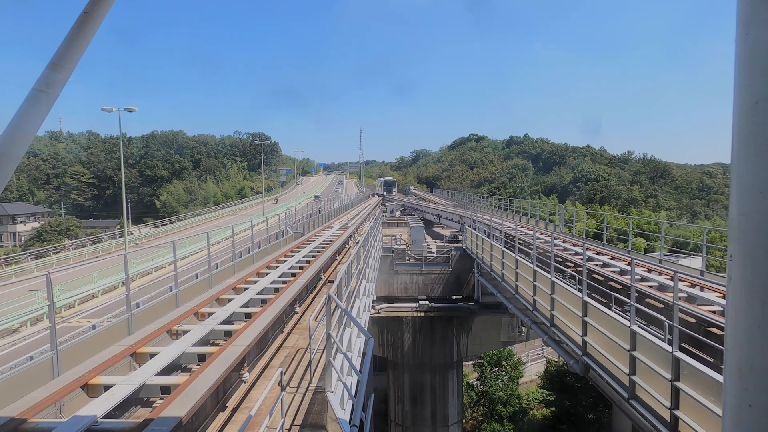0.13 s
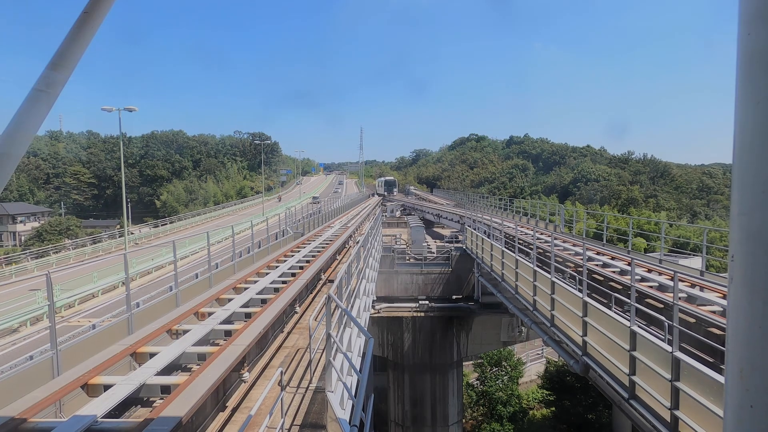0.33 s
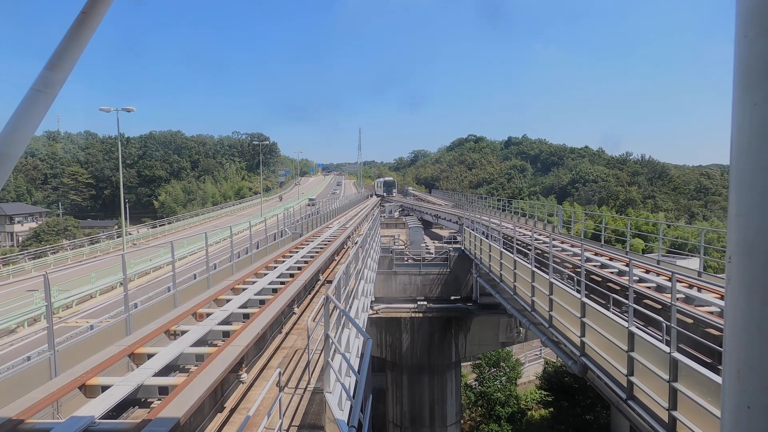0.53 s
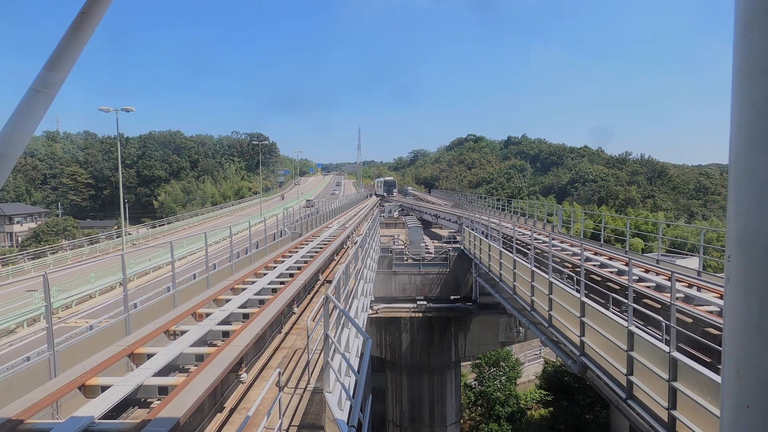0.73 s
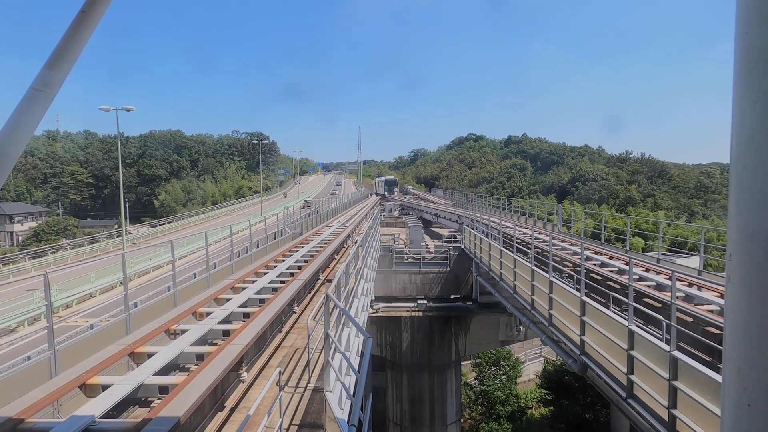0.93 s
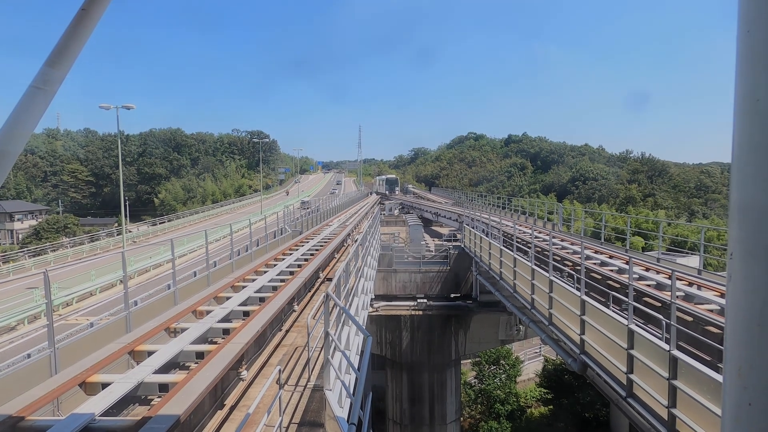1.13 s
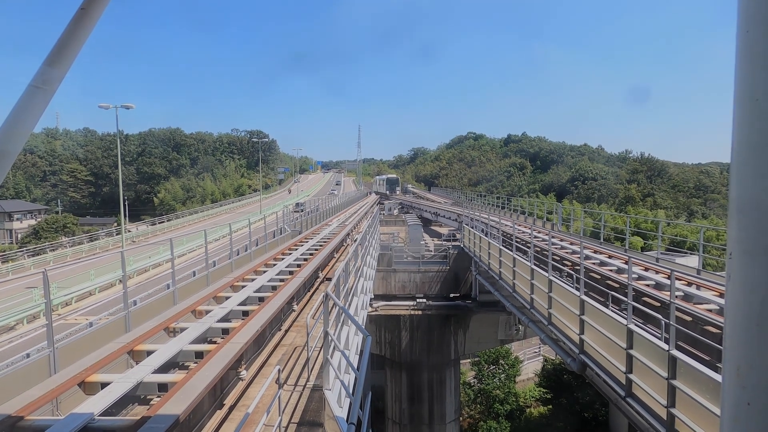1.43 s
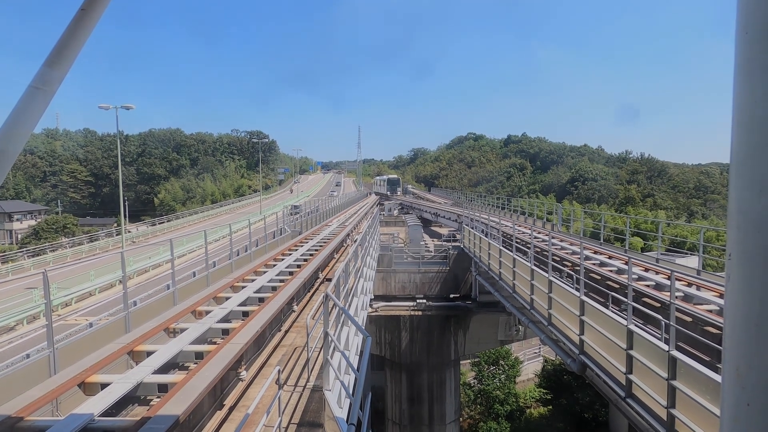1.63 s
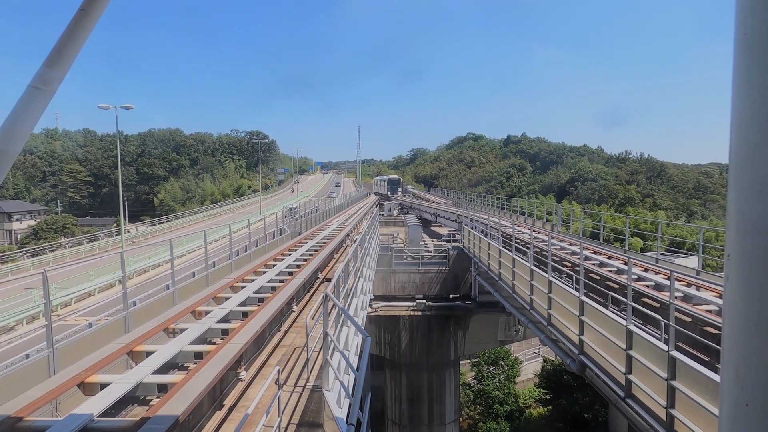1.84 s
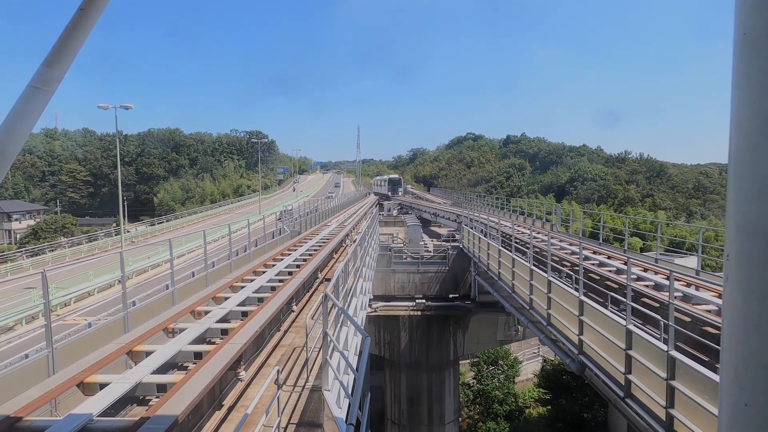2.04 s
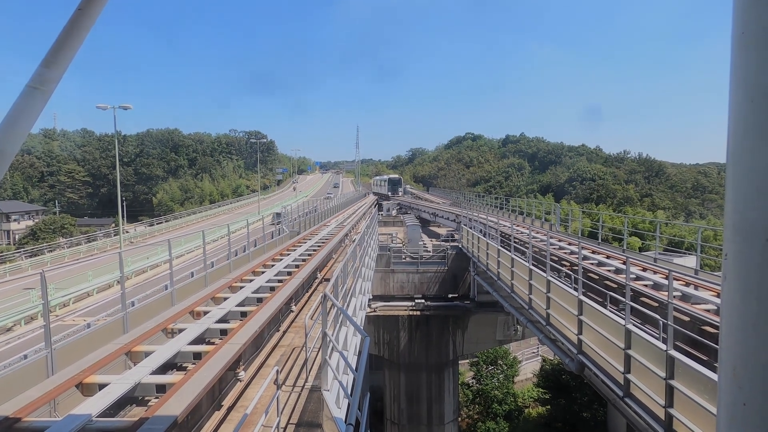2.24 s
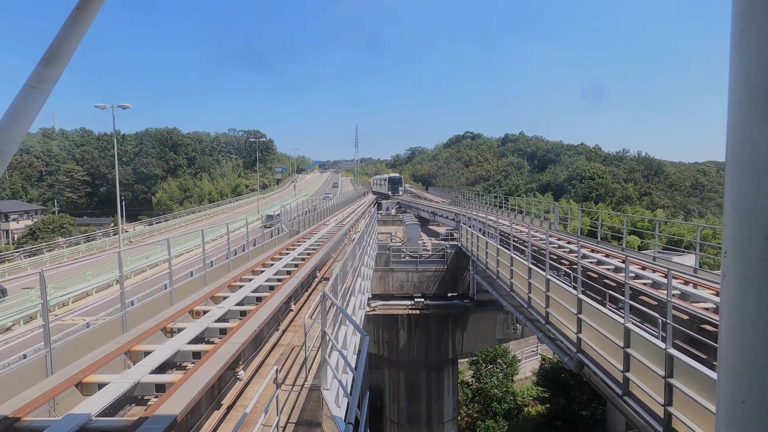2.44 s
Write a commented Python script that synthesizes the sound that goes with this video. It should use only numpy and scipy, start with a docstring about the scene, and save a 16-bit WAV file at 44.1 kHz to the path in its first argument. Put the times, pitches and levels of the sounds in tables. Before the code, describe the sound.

After a moment of silence, dull wide tyre roar opens at once; two distant engines drone in the bass, one rising and falling, one climbing, while a distant train whines thinly; open air, small stereo pair.

```python
"""Tyre roar of a road, heard outdoors beside an elevated track: noise shaped by band, swelling with traffic.
Two far engines sound in the bass as sums of firing orders: one revs up and eases off, one climbs steadily.
A distant train's drive adds a thin rising whine of fluttering partials, with faint tones and a hissy band.
A small stereo microphone pair opens after a short silence."""
import sys
import numpy as np
from scipy import signal
from scipy.io import wavfile
from scipy.ndimage import uniform_filter1d

SR = 44100
rng = np.random.default_rng(int(sys.argv[2]) if len(sys.argv) > 2 else 0)


def convert_level_to_amplitude(level_db):
    """Map a level in decibels to its linear amplitude factor."""
    exponent = np.asarray(level_db, float) / 20
    return 10 ** exponent


def wav_out(sig):
    """Save sig, one row per channel (or a flat mono array), as 16-bit PCM at SR to the path in sys.argv[1]."""
    wavfile.write(sys.argv[1], SR, np.round(np.clip(np.atleast_2d(sig).T, -1, 1) * 32767).astype(np.int16))


N = 114660
t = np.arange(N) / SR

# swell of the nearest traffic: (time [s], level [dB])
TRAFFIC_SWELL = [(.14, -1), (.6, -0.5), (.96, 1), (1.24, 1.5), (1.54, 0), (1.79, -2.5), (2.0, -4),
                 (2.3, -3), (2.59, -5)]
# share of that swell reaching each band: (frequency [Hz], share [1])
SWELL_SHARE = [(100, 0.13), (300, 0.51), (650, 1.11), (1100, 1.02), (2800, 0.2), (6000, 0.65)]
# relative spectral density of the road noise: (frequency [Hz], level [dB per Hz])
ROAR_SPECTRUM = [(15, -27), (22, -11), (43, -5), (64, -7.5), (115, -11.5), (170, -10.5), (300, -15),
                 (540, -17.5), (733, -16.5), (966, -9), (1140, -10.5), (1510, -20), (2040, -23.5),
                 (4200, -39.5), (8600, -58.5), (12600, -75.5), (14000, -87)]
# likeness of the road noise in the two ports: (frequency [Hz], correlation [1])
PORT_LIKENESS = [(150, .9965), (400, .98), (560, .89), (1000, .87), (1700, .78), (3200, .49), (4400, .22),
                 (7500, .06)]
# phase by which the left port leads: (frequency [Hz], lead [rad])
PORT_LEAD = [(900, 0), (2800, -.5), (4200, -1.1), (5700, -3.3)]
# balance, left minus right: (frequency [Hz], level [dB])
PORT_LEAN = [(200, -.1), (400, .8), (1000, 2.4), (2000, 1.7), (4800, -1), (6500, .8)]
ROAR_DB = -24  # rms of the whole road noise

# firing rate of the engine that revs up and eases off: (time [s], frequency [Hz])
REVVING_HZ = [(.14, 59.71), (.63, 70.67), (1.2, 80.46), (1.7, 87.64), (2.0, 82.8), (2.3, 71.27),
              (2.59, 67.6)]
# its orders, swelling with the air path: (time [s], order 1 [dB], order 2 [dB])
REVVING_ORDERS = [(.15, -18, -50), (.25, -24, -47), (.33, -29, -54), (.47, -25.5, -40.5), (.59, -34, -36.5),
                  (.75, -33, -40.5), (.95, -24, -37.5), (1.13, -39.5, -35), (1.27, -28, -38),
                  (1.4, -35, -31), (1.63, -26, -35), (1.8, -38, -34.5), (2.03, -22, -45.5),
                  (2.11, -30.5, -36.5), (2.29, -20.5, -40), (2.39, -46, -36), (2.45, -29, -52),
                  (2.57, -51, -40.5)]
# its third order: (time [s], level [dB])
REVVING_ORDER_3 = [(.3, -48), (.51, -37.5), (1.2, -42.5), (1.4, -48.5), (1.63, -36.5), (1.8, -44)]
# firing rate of the heavy engine pulling steadily: (time [s], frequency [Hz])
PULLING_HZ = [(.14, 32.73), (1.1, 43), (1.7, 50.61), (2.59, 59.44)]
# its first order: (time [s], level [dB])
PULLING_ORDERS = [(.15, -55), (.23, -27.5), (.45, -44), (.57, -28), (.75, -33.5), (1.17, -29.5),
                  (1.33, -36), (1.41, -28), (1.53, -26), (1.89, -22), (2.009, -28), (2.45, -25.5),
                  (2.57, -36)]
# its third order: (time [s], level [dB])
PULLING_ORDER_3 = [(1.299, -48.5), (1.529, -31.5), (1.75, -33.5), (1.95, -50)]
ENGINE_WOBBLE = 0.011  # relative rms unsteadiness of the firing rate

# pitch of the train's drive: (time [s], frequency [Hz])
DRIVE_HZ = [(.14, 2061), (.9, 2088), (1.4, 2099), (1.86, 2117)]
# lower partials of the whine: (time [s], partial 1 [dB], partial 2 [dB])
LOWER_PARTIALS = [(.15, -46.5, -59), (.25, -46, -69), (.39, -36.5, -73), (.46, -37.5, -58), (.53, -40, -52),
                  (.6, -39.5, -60), (.66, -49, -68), (.71, -34.5, -67), (.8, -40, -66), (.89, -32, -70),
                  (.99, -46, -59.5), (1.06, -37, -61), (1.18, -43.5, -58), (1.26, -36, -70),
                  (1.37, -37, -63), (1.44, -53, -71), (1.54, -40, -74), (1.66, -46, -76),
                  (1.71, -39.5, -72), (1.77, -50, -78), (1.84, -38.5, -72)]
# upper partials of the whine: (time [s], partial 3 [dB], partial 4 [dB])
UPPER_PARTIALS = [(.14, -71, -76), (.45, -71, -74.5), (.6, -75, -68), (.8, -82, -78), (.99, -74, -66.5),
                  (1.1, -76, -79), (1.6, -85, -87)]
# swing of partial 1 between the ports: (time [s], left minus right [dB], left leads [rad])
WHINE_SWING = [(.15, -2, -.2), (.44, -1, .5), (.63, 11, 1.8), (.7, 0, .7), (.93, 12, -1), (1.02, 3, -.2),
               (1.13, 13, -2.2), (1.21, -11, -1.5), (1.34, 0, -.9), (1.66, -9, 1.7), (1.84, 7, -.3)]
# fainter tones: (start [s], end [s], start frequency [Hz], end frequency [Hz], level at mid-tone [dB])
FAINT_TONES = [(.14, .8, 2028, 2036, -46), (.78, 1.05, 1983, 1978, -44), (1.2, 1.33, 1984, 1984, -44),
               (1.35, 1.8, 2038, 2052, -48), (.6, 1.3, 8500, 8545, -77)]
WHINE_STOP_S, WHINE_FADE_S = 1.87, 0.023  # the fade ends at the stop
# the other tones swing by chance about a mean lean and lead of the left port (swing as rms)
MEAN_LEAN_DB, MEAN_LEAD_RAD, SWING_DB, SWING_RAD = 1, -0.25, 6.5, 0.66
FLUTTER_HZ, FLUTTER_DB = 34.85, 3.5  # fastest rate; rms depth for the high and faint tones
WAVER = 0.00087  # relative rms waver of pitch
HISS_HZ, HISS_WIDTH_HZ, HISS_DB = 8570, 270, -69  # band near the top partial
HISS_START_S, HISS_STOP_S = 0.22, 1.67
OPEN_S, CLOSE_S = .12725, .004  # instant of opening; length of the closing fade


def evened(x):
    """Normalization of power: unit rms."""
    return x / np.sqrt(np.mean(x ** 2) + 1e-20)


def read(points, hz):
    """Interpolation of a spectrum on a logarithmic frequency axis."""
    f, value = np.transpose(points)
    return np.interp(np.log(hz + 1), np.log(f + 1), value)


def column(table, index):
    """Linear interpolation over time of one column of a table."""
    rows = np.array(table)
    return np.interp(t, rows[:, 0], rows[:, index])


def drift(rate_hz):
    """Random modulation of unit rms: superposed sines of random phase, up to rate_hz."""
    rates = np.geomspace(rate_hz / 10, rate_hz, 16)
    return evened(sum(np.sin(2 * np.pi * (f * t + rng.random())) for f in rates))


def road(patchy_db=1.08, flicker_db=-0.01):
    """Diffuse field of tyre noise: partly coherent between the ports, its swell weighted by band."""
    size, hop = 1024, 256
    frames, hz = N // hop + 5, np.fft.rfftfreq(size, 1 / SR)
    a, b, c, d, patches = rng.standard_normal((frames, len(hz), 5)).T
    patches = uniform_filter1d(patches, size=10, axis=0)
    patches = evened(uniform_filter1d(patches, size=10, axis=1))
    flicker = evened(uniform_filter1d(rng.standard_normal(frames), size=6))
    swell = np.interp(np.arange(frames) * hop / SR, *np.transpose(TRAFFIC_SWELL))

    # the right port mixes the left port's noise with noise of its own
    likeness = read(PORT_LIKENESS, hz)[:, None]
    left = a + 1j * b
    right = likeness * left + np.sqrt(1 - likeness ** 2) * (c + 1j * d)
    right = right * np.exp(-1j * read(PORT_LEAD, hz))[:, None]
    half_lean = read(PORT_LEAN, hz)[:, None] / 2
    ports = np.array([left * convert_level_to_amplitude(half_lean), right * convert_level_to_amplitude(-half_lean)])

    level = read(ROAR_SPECTRUM, hz)[:, None] + read(SWELL_SHARE, hz)[:, None] * swell
    ports *= convert_level_to_amplitude(level + patchy_db * patches + flicker_db * flicker)
    noise = signal.istft(ports, nperseg=size, noverlap=size - hop)[1][:, :N]
    return convert_level_to_amplitude(ROAR_DB) * evened(noise)


def engine(pitch, levels, third):
    """Harmonic series of firing: slightly unsteady orders locked to one phase, alike in both ports."""
    rate = column(pitch, index=1) * (1 + ENGINE_WOBBLE * drift(12))
    phase = 2 * np.pi * np.cumsum(rate) / SR
    orders = [(m, column(levels, index=m)) for m in range(1, len(levels[0]))]
    orders.append((3, column(third, index=1)))
    return sum(np.sqrt(2) * convert_level_to_amplitude(db) * np.sin(m * phase + 2 * np.pi * rng.random()) for m, db in orders)


def train():
    """Tonal radiation of the drive: harmonic partials until it cuts out, faint tones and band noise."""
    swing = column(WHINE_SWING, index=1), column(WHINE_SWING, index=2)
    whine = partial(LOWER_PARTIALS, order=1, index=1, flutter_db=1.8, swing=swing)
    whine = whine + partial(LOWER_PARTIALS, order=2, index=2, flutter_db=1.0)
    whine = whine + partial(UPPER_PARTIALS, order=3, index=1, flutter_db=FLUTTER_DB)
    whine = whine + partial(UPPER_PARTIALS, order=4, index=2, flutter_db=FLUTTER_DB)
    whine = whine * np.clip((WHINE_STOP_S - t) / WHINE_FADE_S, 0, 1)
    return whine + faint_tones() + hiss()


def partial(levels, order, index, flutter_db, swing=None):
    """Harmonicity: a tone at a whole multiple of the drive's pitch."""
    return far_tone(order * column(DRIVE_HZ, index=1), column(levels, index), flutter_db, swing)


def faint_tones():
    """Gliding sinusoids beside the partials, each rising and dying within its span."""
    out = np.zeros((2, N))
    for start, end, from_hz, to_hz, db in FAINT_TONES:
        u = np.clip((t - start) / (end - start), 0, 1)
        envelope = np.sqrt(abs(np.sin(np.pi * u)))
        out += envelope * far_tone(from_hz + (to_hz - from_hz) * u, db, FLUTTER_DB)
    return out


def hiss():
    """Band-limited noise, independent in the two ports, rising slowly and stopping quickly."""
    edges = [HISS_HZ - HISS_WIDTH_HZ / 2, HISS_HZ + HISS_WIDTH_HZ / 2]
    band = signal.butter(2, edges, "band", fs=SR, output="sos")
    noise = evened(signal.sosfilt(band, rng.standard_normal((2, N))))
    rise = np.clip((t - HISS_START_S) / .5, 0, 1)
    fall = np.clip((HISS_STOP_S - t) / WHINE_FADE_S, 0, 1)
    return convert_level_to_amplitude(HISS_DB) * rise * fall * noise


def far_tone(hz, db, flutter_db, swing=None):
    """Multipath arrival imitated: a tone flutters, and its balance and phase swing between the ports."""
    phase = 2 * np.pi * (np.cumsum(hz * (1 + WAVER * drift(15))) / SR + rng.random())
    if swing is None:
        swing = MEAN_LEAN_DB + SWING_DB * drift(6), MEAN_LEAD_RAD + SWING_RAD * drift(4)
    lean_db, lead = swing
    port = convert_level_to_amplitude(lean_db / 2) * np.exp(.5j * lead)
    # db refers to the mean of the ports; the floor limits the boost where they nearly cancel
    ports = np.array([port, 1 / port]) / np.maximum(abs(port + 1 / port) / 2, .35)
    level = convert_level_to_amplitude(db + flutter_db * drift(FLUTTER_HZ))
    return np.sqrt(2) * level * (ports * np.exp(1j * phase)).imag


def scene():
    """Superposition of road, engines and train."""
    revving = engine(REVVING_HZ, REVVING_ORDERS, REVVING_ORDER_3)
    pulling = engine(PULLING_HZ, PULLING_ORDERS, PULLING_ORDER_3)
    return road() + revving + pulling + train()


def band_limit(x):
    """A steep low-pass at the top of the band."""
    return signal.sosfilt(signal.butter(12, 16850, fs=SR, output="sos"), x)


def record(dry):
    """Gating: the microphone pair opens abruptly and closes with a short linear fade."""
    opened = t >= OPEN_S
    closing = np.minimum((t[-1] - t) / CLOSE_S, 1)
    return band_limit(dry * opened * closing)


dry = scene()
out = record(dry)
wav_out(out)
```